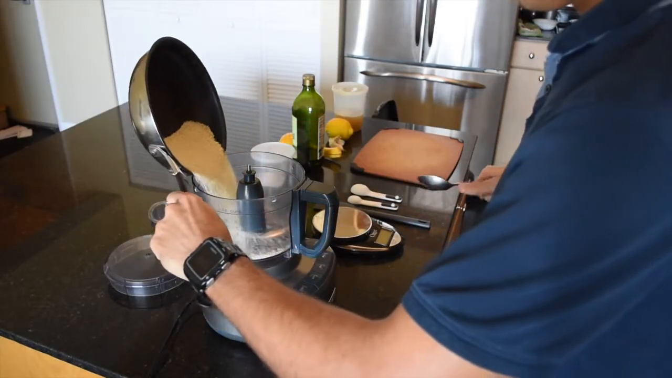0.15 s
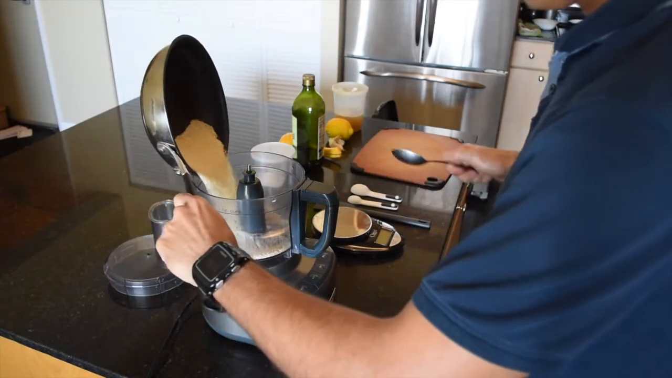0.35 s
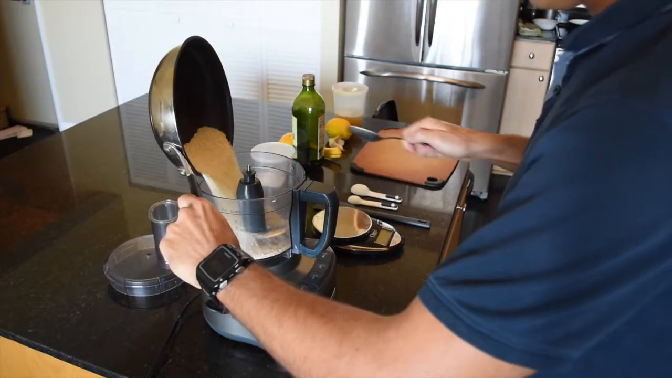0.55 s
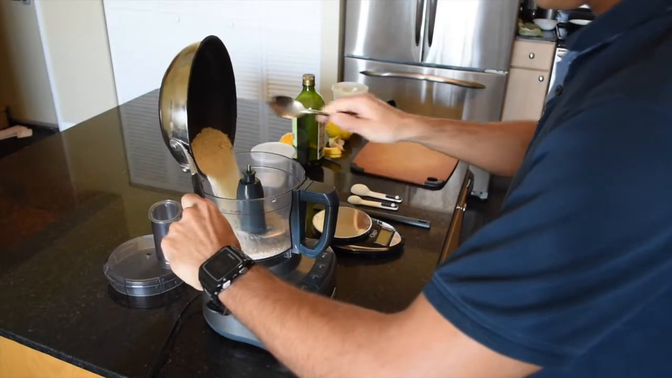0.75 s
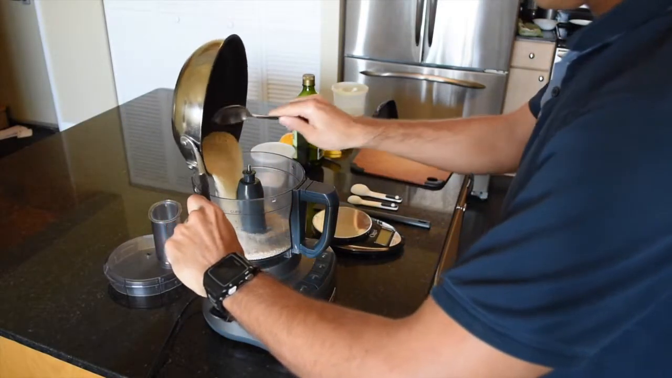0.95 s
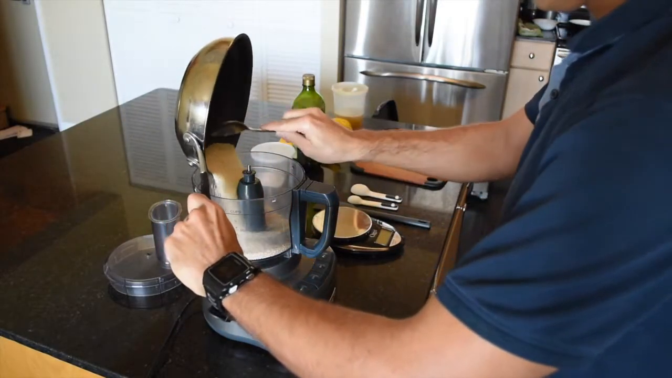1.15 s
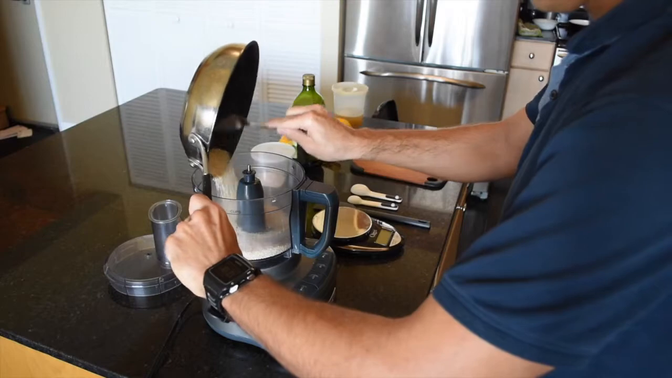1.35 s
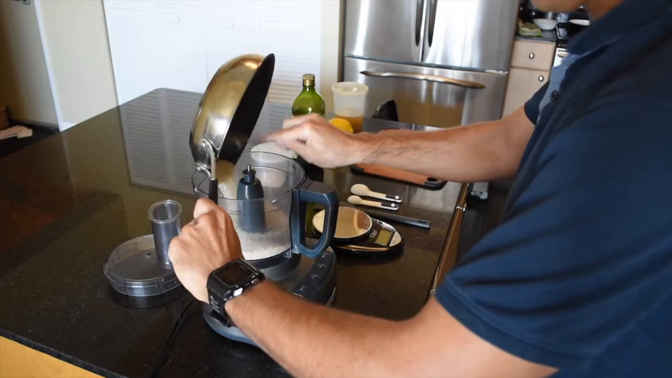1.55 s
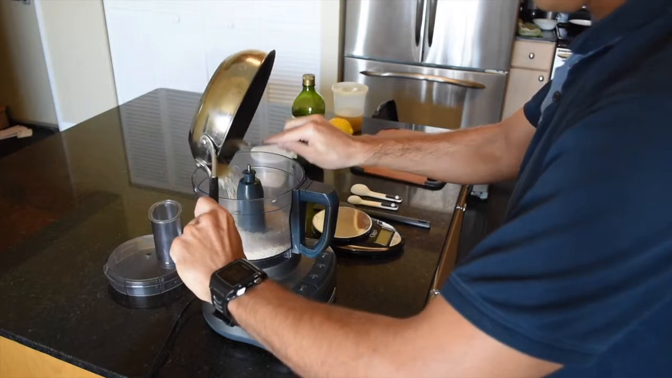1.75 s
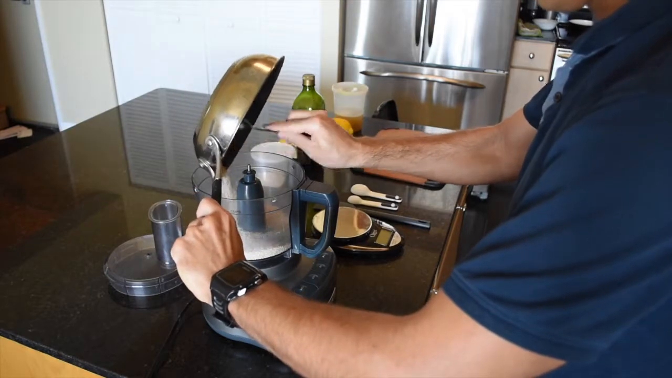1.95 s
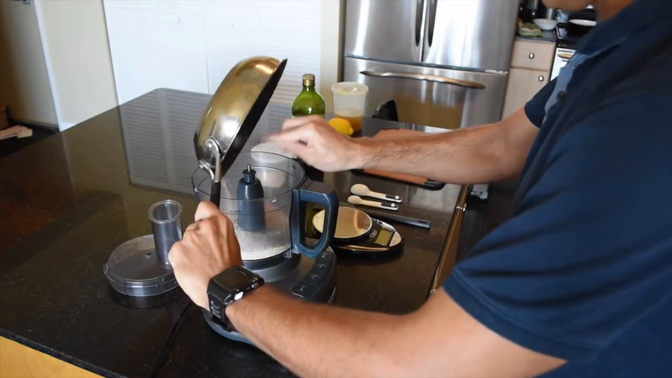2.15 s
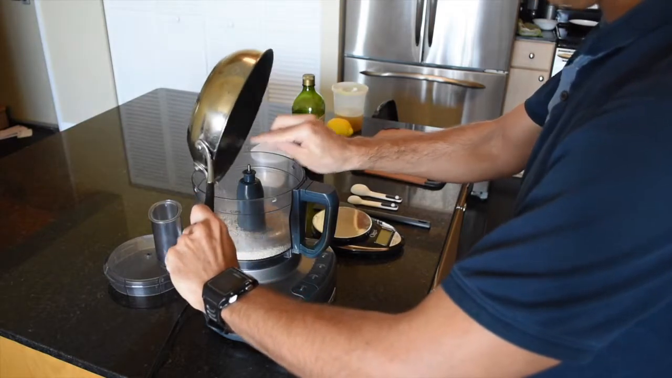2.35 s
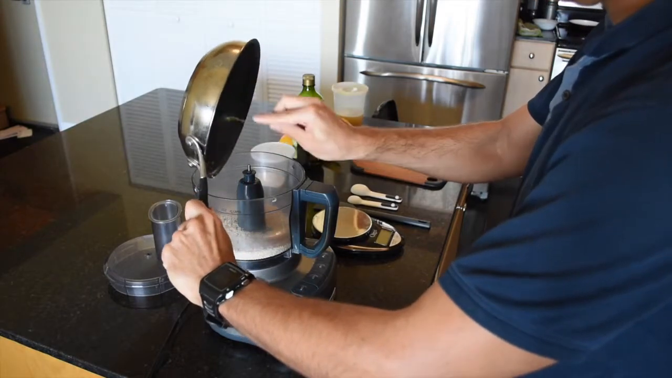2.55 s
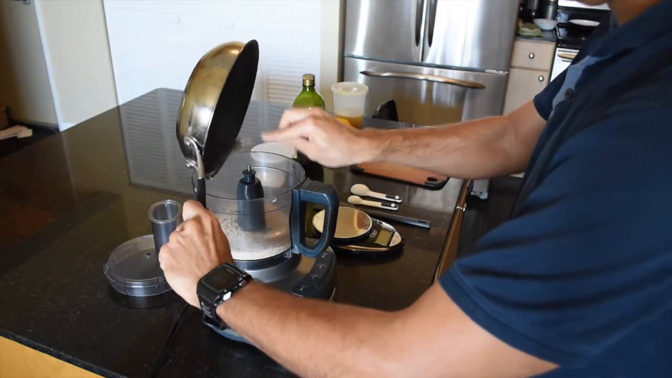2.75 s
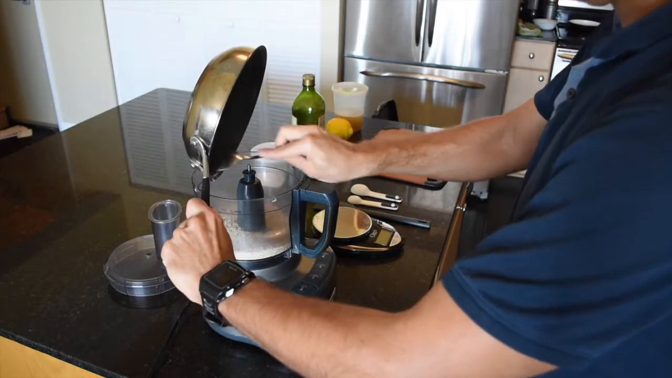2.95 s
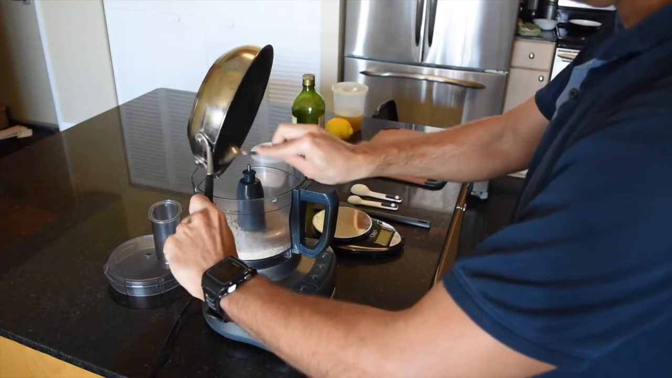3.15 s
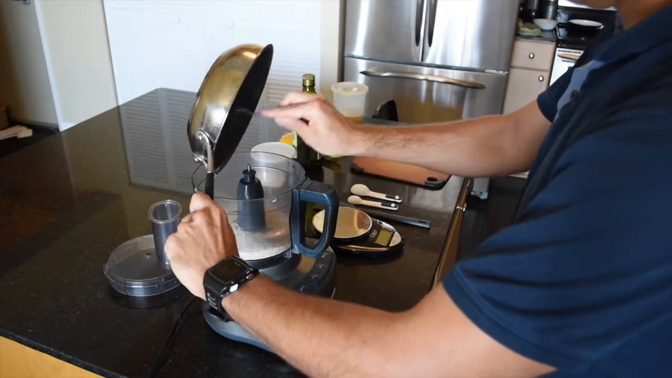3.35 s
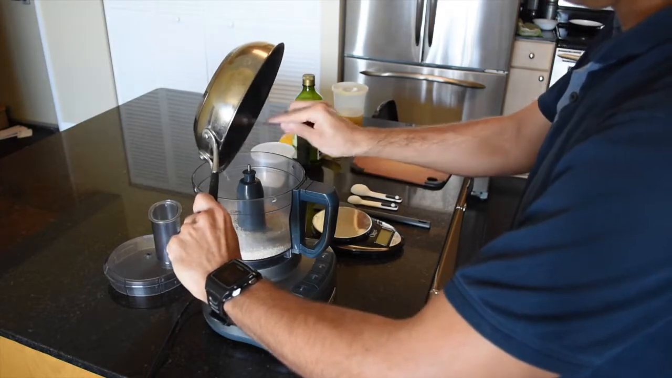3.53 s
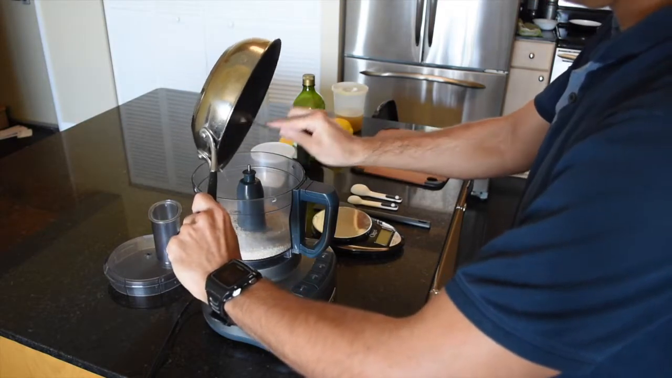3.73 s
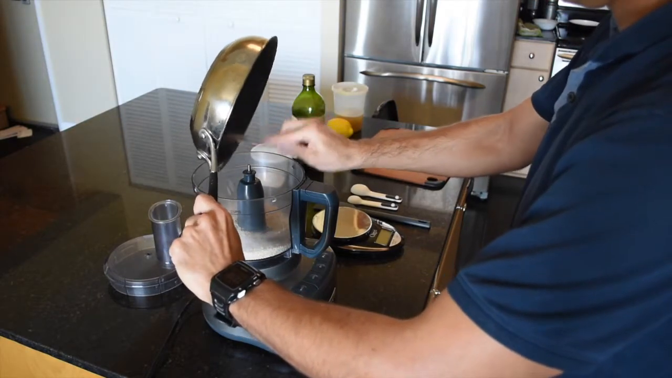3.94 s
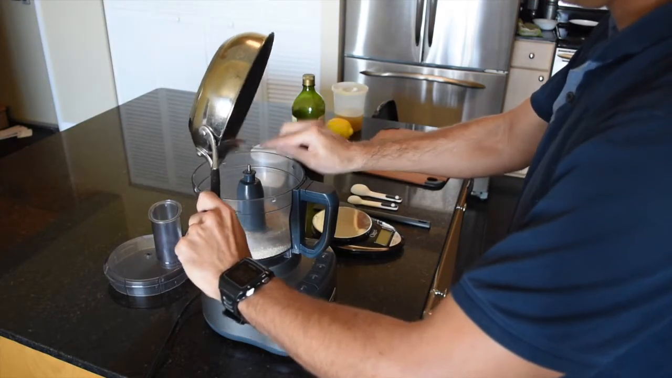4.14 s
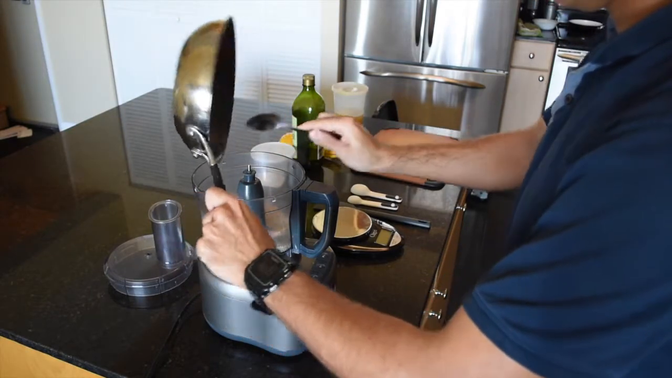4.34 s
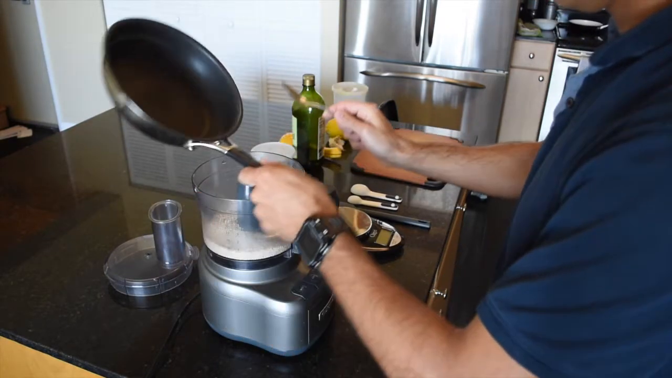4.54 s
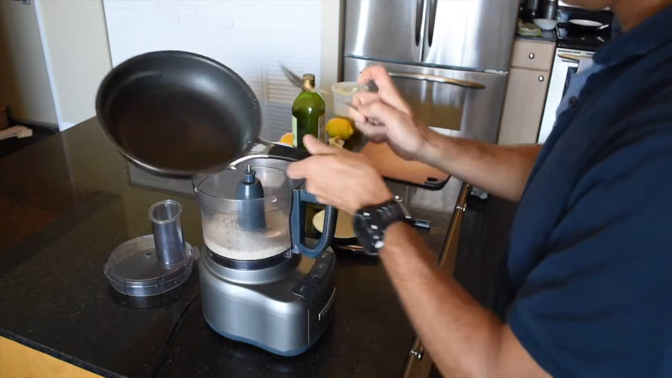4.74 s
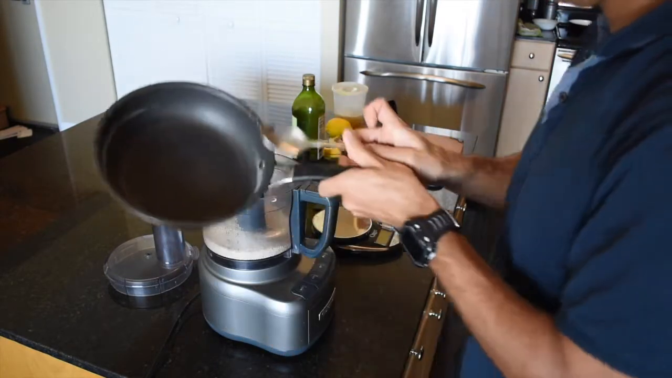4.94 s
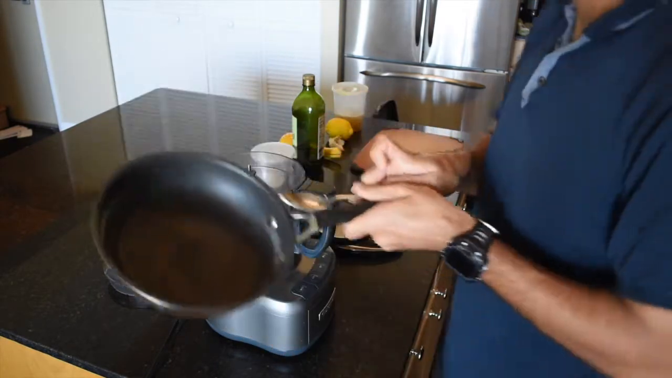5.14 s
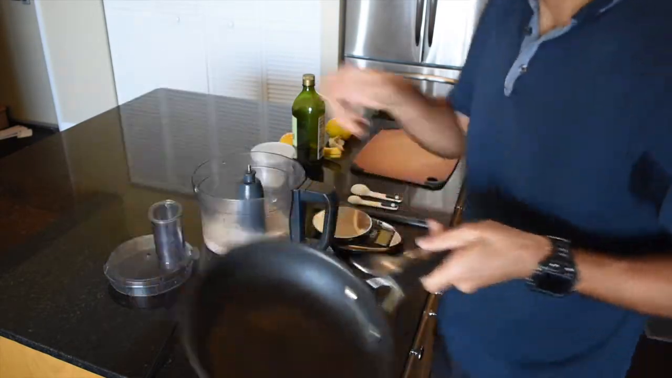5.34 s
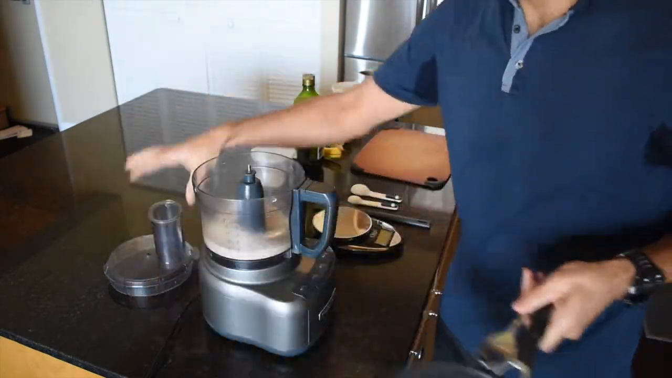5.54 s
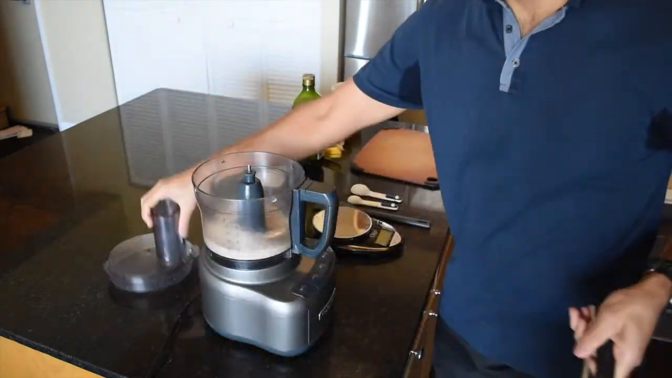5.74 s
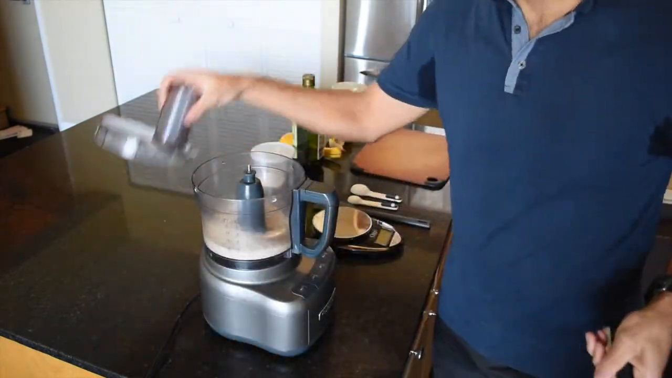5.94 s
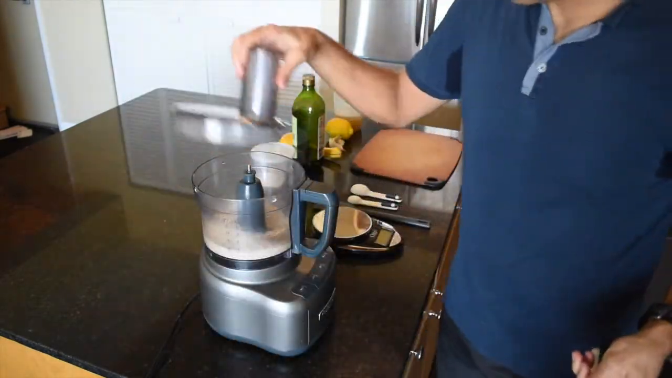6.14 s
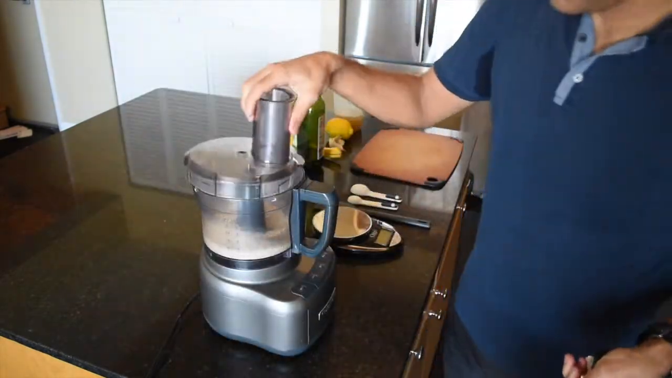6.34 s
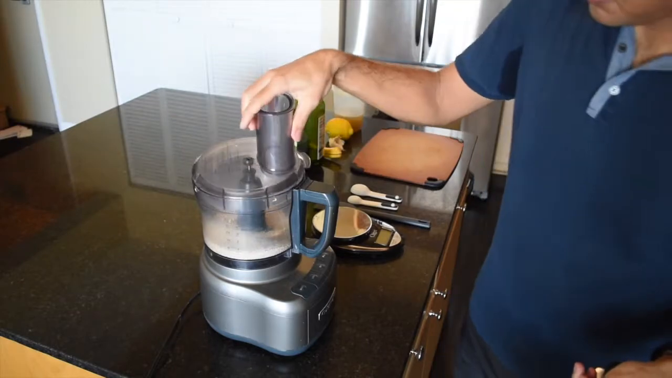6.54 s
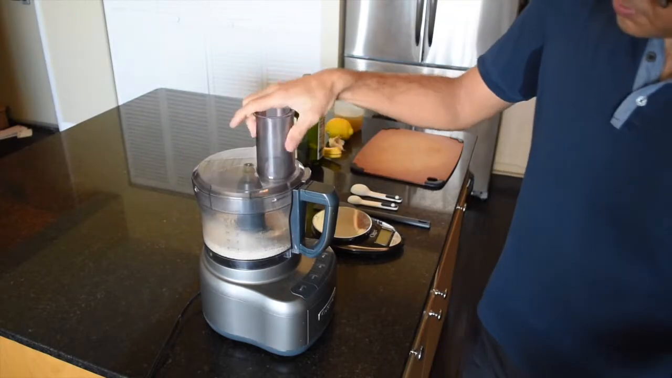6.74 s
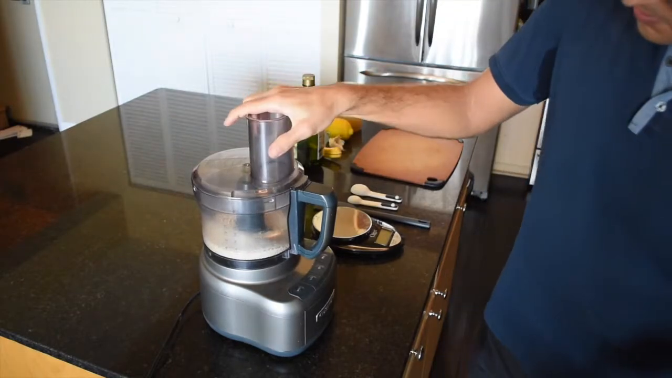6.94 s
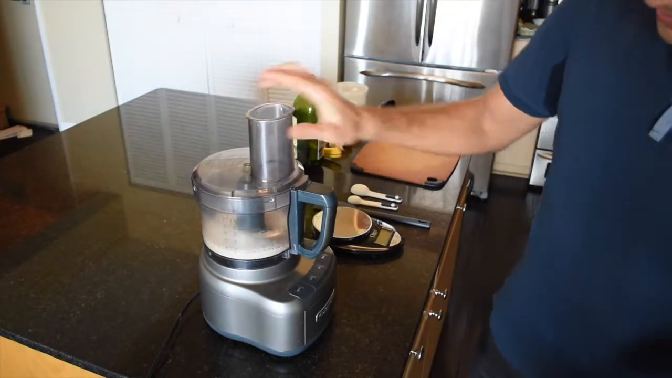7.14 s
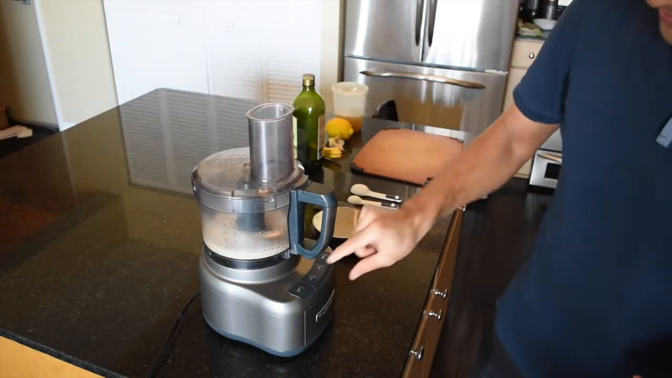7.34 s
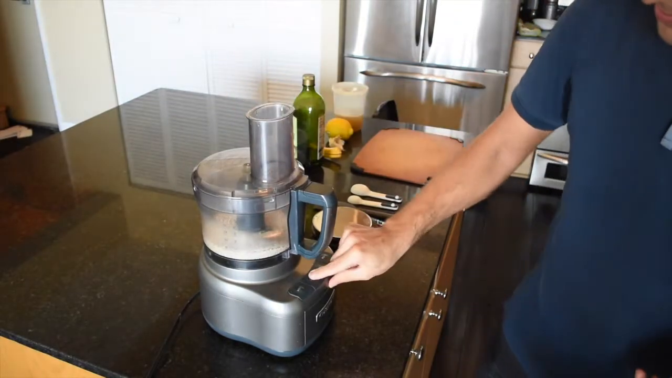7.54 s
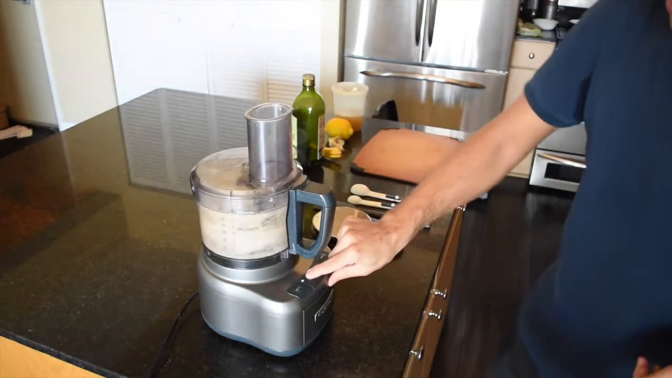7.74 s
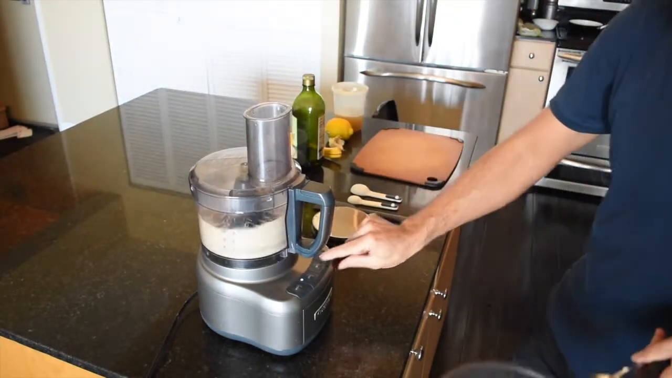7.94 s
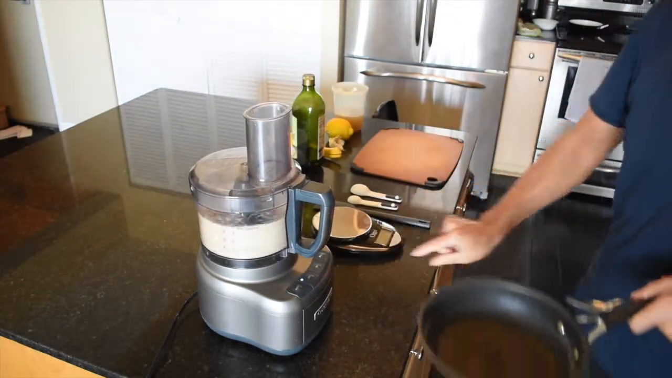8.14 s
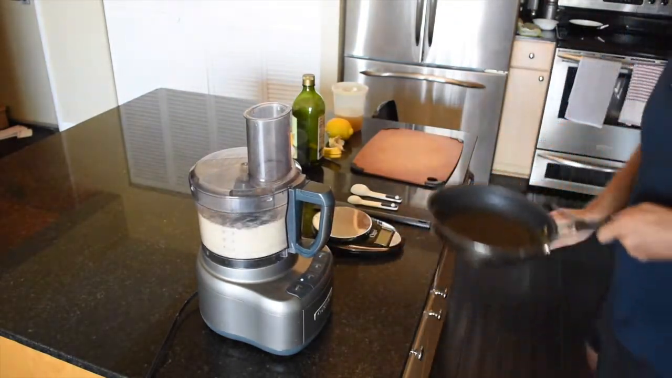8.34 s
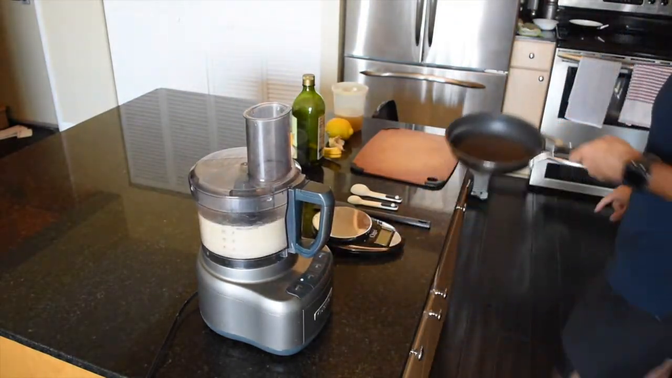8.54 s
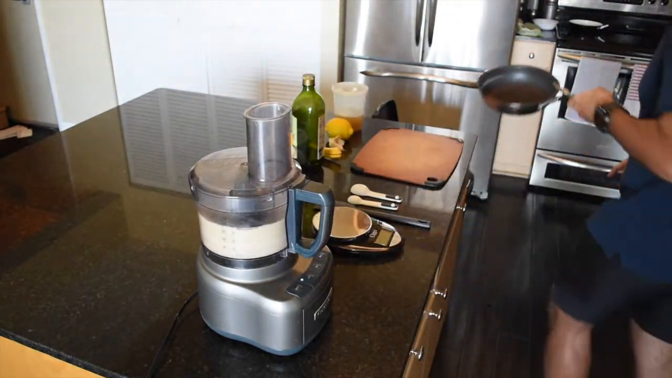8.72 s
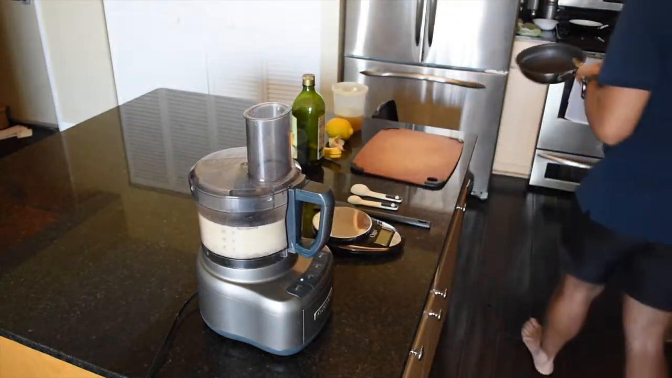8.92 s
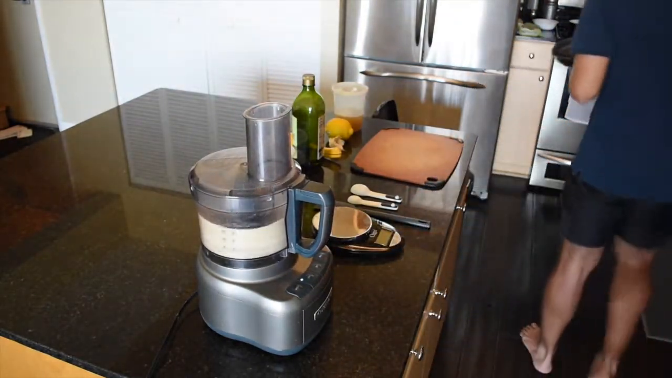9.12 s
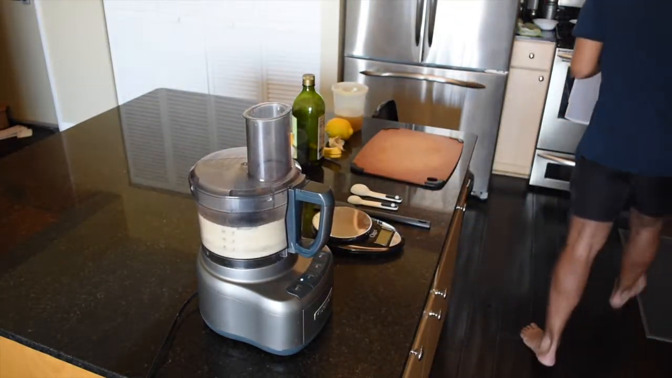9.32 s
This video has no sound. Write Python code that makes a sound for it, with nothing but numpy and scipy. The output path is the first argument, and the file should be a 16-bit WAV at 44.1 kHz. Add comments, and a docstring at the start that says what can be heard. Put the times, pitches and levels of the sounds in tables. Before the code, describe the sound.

Close stationary microphone in a moderately reverberant kitchen: a short rush of dry seeds into plastic, then about twenty bright metallic spoon taps on a pan, loosening small patters of seeds. Soft handling and a faint step follow. A hollow plastic lid is lifted, dropped on the bowl and twisted with gritty scrapes and two loud clacks. The processor then knocks into motion and runs evenly, rattling seeds over a low housing drone to the end.

```python
"""Sesame seeds hiss from a frying pan into the plastic bowl of a food processor: random grains ring pan and bowl.
A steel spoon taps the last seeds out of the pan, each tap a crack, a clank and a set of decaying modes.
The lid is picked up, set on the bowl and twisted until it locks: noise bursts, hollow notes and gritty judders.
Then the motor starts with a hard knock and the blade whirls the seeds: grains pulsing once a turn over a drone.
Kitchen reverberation, a quiet room tone, a low rumble and soft distant steps surround it all."""
import sys
import numpy as np
from scipy import signal
from scipy.fft import rfft, irfft, next_fast_len
from scipy.io import wavfile
from scipy.ndimage import uniform_filter1d

SR = 44100
rng = np.random.default_rng(int(sys.argv[2]) if len(sys.argv) > 2 else 0)


def wav_record(signal):
    """Record a signal, one row per channel, as 16-bit PCM in the file named by sys.argv[1]."""
    frames = np.transpose(np.atleast_2d(signal))
    bounded = np.clip(frames, -1, 1)
    # unit amplitude maps onto the largest positive 16-bit level
    quanta = np.round(bounded * 32767).astype(np.int16)
    wavfile.write(sys.argv[1], SR, quanta)


N = 413644
TIME = np.arange(N) / SR

# Colour of the lid's hard plastic shell. Each row: frequency in Hz, relative density in dB per Hz.
LID_SHELL_COLOUR = [(200, -33), (700, -5), (1050, 6), (1400, -0.5), (1700, 4), (2100, 2), (2700, 1),
                    (3100, 2.5), (3550, 5), (4200, -4), (5500, -4), (8000, -41), (16000, -46)]
# Colour of the lid's bright, gritty contacts. Each row: frequency in Hz, relative density in dB per Hz.
LID_GRIT_COLOUR = [(1500, -11), (4000, 4.5), (7000, -2), (10000, -7), (15500, -15), (17000, -32)]


def from_db(db):
    """Decibels to gain."""
    return 10 ** (np.asarray(db) / 20)


def rms_one(x):
    """Scale to unit rms."""
    return x / np.sqrt(np.mean(x ** 2) + 1e-20)


def since(s):
    """Seconds elapsed since time s; zero before it."""
    return np.maximum(TIME - s, 0)


def at_hz(points, hz):
    """Read a table on a log-frequency axis."""
    freqs, values = np.transpose(points)
    return np.interp(np.log(hz + 1), np.log(freqs), values)


def coloured(x, spectrum):
    """Filter an excitation to a spectrum; rms 1."""
    size = next_fast_len(N)
    hz = np.fft.rfftfreq(size, 1 / SR)
    shaped = rfft(x, size) * from_db(at_hz(spectrum, hz))
    return rms_one(irfft(shaped, size)[:N])


def noise(spectrum):
    """Steady noise of a given colour; rms 1."""
    return coloured(rng.standard_normal(N), spectrum)


def grains(per_s, spread_db):
    """Random impacts of uneven size and either sign; rms 1."""
    unevenness = np.minimum(rng.exponential(1, N), 5)
    sizes = from_db(spread_db * unevenness) * rng.choice([-1, 1], N)
    return rms_one(sizes * (rng.random(N) < per_s / SR))


def resonate(x, resonances):
    """Parallel two-pole resonances, each at its own level; rms 1."""
    out = 0
    for hz, width, db in resonances:
        r = np.exp(-np.pi * width / SR)  # pole radius
        poles = [1, -2 * r * np.cos(2 * np.pi * hz / SR), r * r]
        out = out + from_db(db) * rms_one(signal.lfilter([1, 0, -1], poles, x))
    return rms_one(out)


def add(track, s, sound):
    """Mix a sound into a track from time s on."""
    start = max(round(s * SR), 0)
    track[start:start + len(sound)] += sound[:max(N - start, 0)]


def blows(rows):
    """Envelope of contacts (s, dB, swell s, t60 s): each swells, then dies away; their powers add."""
    power = np.zeros(N)
    t = TIME[:SR // 2] - TIME[SR // 20]  # from 50 ms before the peak
    for s, db, swell, t60 in rows:
        rise = np.exp(-.5 * (np.minimum(t, 0) / swell) ** 2)
        decay = from_db(db - 60 * np.maximum(t, 0) / t60)
        add(power, s + t[0], (rise * decay) ** 2)
    return np.sqrt(power)


def ring(modes, strengths_db, sustain=1):
    """Free decay of modes struck with the given strengths; sustain scales every t60."""
    hz, db, t60 = np.transpose(modes)[:, :, None]
    t = TIME[:SR * 2 // 3]
    height = rng.choice([-1, 1], hz.shape) * from_db(db + np.reshape(strengths_db, (-1, 1)))
    decay = np.exp(-np.log(1000) * t / (t60 * sustain))
    return np.sum(height * decay * np.sin(2 * np.pi * hz * t), axis=0)


def background(tone_db):
    """Quiet room air over a low rumble of changing level, and soft distant steps through the floor."""
    # Colour of the room air. Each row: frequency in Hz, relative density in dB per Hz.
    air_colour = [(15, -23.5), (25, -6.5), (72, -12), (270, -7.5), (416, -18.5), (476, -16), (1160, -25),
                  (2160, -30.5), (3620, -30), (14400, -40), (16000, -43)]
    # Colour of the low rumble. Each row: frequency in Hz, relative density in dB per Hz.
    rumble_colour = [(20, 4), (45, -3.5), (80, -15), (170, -13.5), (300, -13.5), (700, -19.5), (2000, -47)]
    # Loudness of the rumble. Each row: time in seconds, level in dB.
    rumble_level = [(1.1, -55), (1.2, -65.5), (4.9, -78), (9.38, -79.5)]
    # Distant steps. Each row: peak in seconds, level in dB.
    step_times = [(5.12, -58), (8.46, -65), (9.049, -58)]
    # Colour of the floor. Each row: frequency in Hz, relative density in dB per Hz.
    step_colour = [(20, 4), (36, 9), (48, -9), (70, -29), (200, -44)]
    rumble_db = np.interp(TIME, *np.transpose(rumble_level))
    steps = blows([(s, db, .05, .4) for s, db in step_times]) * noise(step_colour)
    return from_db(tone_db) * noise(air_colour) + from_db(rumble_db) * noise(rumble_colour) + steps


def seeds(hiss_db, ring_db, patter_db, patter_ring_db):
    """Seeds stream into the bowl, ever sparser and softer; four brief showers of loose seeds follow."""
    # Hiss of the seeds. Each row: frequency in Hz, relative density in dB per Hz.
    hiss_colour = [(120, -36.5), (200, -27.5), (659, -16), (1020, -38), (1500, -3.5), (1810, -21),
                   (1940, -9.5), (2610, -15), (3620, -4), (3970, -7), (5230, -3.5), (6400, -12),
                   (12800, -12.5), (16000, -22)]
    # Pan and bowl under the seeds. Each row: frequency in Hz, width in Hz, relative level in dB.
    pour_resonances = [(1406, 65, 6), (1485, 50, -7), (3484, 32, 8.5), (4300, 110, -4), (5200, 96, -10),
                       (6900, 100, -2.5), (9000, 110, -4), (10600, 130, -9)]
    # Seeds shaken loose by the taps. Each row: centre in seconds, relative level in dB.
    showers_freed = [(2.715, -39.5), (2.98, -46), (3.215, -46), (3.55, -50.5)]
    # The heap slides out and thins, leaving a trickle that then runs dry; slopes in dB per second.
    heap_db, heap_hold_s, heap_fall = -37.5, .2, 34
    trickle_db, trickle_end_s, trickle_fall = -52.5, 1.145, 56.5
    shower_spread_s = 0.019
    heap = from_db(heap_db - heap_fall * since(heap_hold_s))
    trickle = from_db(trickle_db - trickle_fall * since(trickle_end_s))
    flow = np.hypot(heap, trickle)
    impacts = grains(2500 + 14000 * flow / flow.max(), spread_db=-1.0)
    hiss = from_db(hiss_db) * coloured(impacts, hiss_colour)
    stream = flow * (hiss + from_db(ring_db) * resonate(impacts, pour_resonances))
    # even out the changing grain density, so that flow alone sets the level
    stream = stream / np.sqrt(uniform_filter1d(impacts ** 2, size=SR // 10) + 1e-9)
    showers = sum(from_db(db) * np.exp(-.5 * ((TIME - s) / shower_spread_s) ** 2) for s, db in showers_freed)
    loose = grains(900, spread_db=2.0)
    patter = from_db(patter_db) * coloured(loose, hiss_colour)
    patter = patter + from_db(patter_ring_db) * resonate(loose, pour_resonances)
    return stream + showers * patter


def bumps_ticks_and_blade_knock(bump_t60, tick_t60):
    """Dull bumps of the nudged bowl, light handling ticks, and one hard knock of the blade as the motor starts."""
    # Nudges of the bowl on its base. Each row: peak in seconds, relative level in dB.
    nudges = [(0.46, -38), (1.545, -42.5), (2.239, -39), (3.238, -45)]
    # Colour of the nudged bowl. Each row: frequency in Hz, relative density in dB per Hz.
    nudge_colour = [(60, -29.5), (185, -24), (240, 7.5), (320, -4), (370, -7), (500, 9), (650, -11),
                    (1200, -20), (5000, -37)]
    # Light handling ticks, and last the far louder knock of the blade as the motor starts.
    # Each row: peak in seconds, relative level in dB.
    ticks_and_knock = [(4.721, -66), (4.82, -65.5), (4.99, -58), (5.239, -60.5), (7.588, -32.5)]
    bumps = blows([(s, db, .001, bump_t60) for s, db in nudges]) * noise(nudge_colour)
    contact_noise = noise(LID_SHELL_COLOUR) + 0.37 * noise(LID_GRIT_COLOUR)
    contacts = blows([(s, db, .0005, tick_t60) for s, db in ticks_and_knock]) * contact_noise
    return bumps + contacts


def spoon(taps, modes, shell, ring_db, treble_ring_db, sustain, body_db, crack_db, body_t60, crack_t60):
    """Steel on the pan: a crack, a short clank, and modes whose strengths depend on the spot struck."""
    # Crack of the contact. Each row: frequency in Hz, relative density in dB per Hz.
    crack_colour = [(1000, -22), (2400, 0), (3200, 11.5), (3800, -3.5), (4500, 2.5), (6200, -2.5),
                    (8000, -0.5), (12000, 0.5), (15500, -7), (17000, -20.5)]
    # Near the lip some modes are struck near their nodes, others near their bellies.
    # Each row: frequency in Hz, change in dB at the lip.
    lip_colour = [(1530, -0.5), (3120, -4), (4500, 5), (5190, 1.5), (5700, -7.5), (6500, 2.5), (8000, -0.5)]
    # each dB of strength above a firm tap adds this many extra dB; below it, takes them away
    firm_tap_db, clank_growth, crack_growth = -27, 0.13, 0.33
    crack_octaves = 2.2  # height of the crack above the lowest mode
    mode_scatter_db = 3.5  # from tap to tap, at the highest mode
    rings, clanks, cracks = np.zeros(N), [], []
    mode_hz = np.array(modes)[:, 0]
    octaves = np.log2(mode_hz / mode_hz[0])
    height = octaves / octaves[-1]
    for s, db, brightness, spot in taps:
        scatter_db = mode_scatter_db * height * rng.standard_normal(len(modes))
        spot_db = spot * at_hz(lip_colour, mode_hz) + scatter_db
        tone_db = brightness * octaves + treble_ring_db * height
        add(rings, s, ring(modes, db + ring_db + tone_db + spot_db, sustain))
        force_db = db - firm_tap_db
        clanks.append((s, db + body_db + clank_growth * force_db, .0002, body_t60))
        sharpness_db = crack_growth * force_db + crack_octaves * brightness
        cracks.append((s, db + crack_db + sharpness_db, .0002, crack_t60))
    return rings, blows(clanks) * noise(shell) + blows(cracks) * noise(crack_colour)


def pan_taps():
    """The spoon taps the pan, exciting its modes and a dense short-lived body."""
    # Each row: start in seconds, relative strength in dB, brightness in dB per octave,
    # spot struck from -1 high up to 1 near the lip.
    taps = [(1.147, -42.5, -1.5, -.1), (1.403, -33, 0.5, -0.89), (1.521, -38.5, -6, -0.76),
            (1.577, -30.5, 0.16, -0.16), (1.730, -26.5, 0.5, -0.64), (1.882, -29, 1, -0.065),
            (1.971, -37.5, -1.5, -0.73), (2.027, -27.5, 1.3, 0), (2.132, -40, .8, 0.22),
            (2.188, -28.5, .3, 0.69), (2.383, -28.5, -1.5, 0.19), (2.616, -30, -2.4, 0.44),
            (2.885, -30, -2.4, 0.38), (3.121, -31, -3.2, 1), (3.365, -40.5, -4, -0.38),
            (3.430, -25, 0.87, 0.95), (3.617, -27.5, 1.44, -.2), (3.794, -25.5, 1.9, -0.48),
            (3.959, -25.5, 2.4, -0.07), (4.655, -63.5, -4, .5)]
    # Ring of spoon and pan. Each row: frequency in Hz, relative level in dB, t60 in seconds before sustain.
    modes = [(1482, -10, .15), (1529, -2, .6), (1565, -9, .2), (3117, 0.5, .42), (3131, -6, .3),
             (3181, -7, .2), (3299, -14, .25), (4443, -4, .22), (4562, -3, .24), (5187, -2, .18),
             (5702, 0, .19), (6496, -4, .3), (6862, -10, .3), (7227, -13, .22), (8021, -11, .22),
             (8278, -9, .22), (9259, -15, .3), (9396, -10, .18), (9623, -10, .18), (9771, -10, .18),
             (11385, -11, .16), (14277, -10, .14)]
    # Dense short-lived modes of the pan. Each row: frequency in Hz, relative density in dB per Hz.
    body = [(40, -20.5), (90, -26.5), (200, -23.5), (290, -9), (385, -0.5), (490, 0.5), (700, -3.5),
            (880, 3), (1100, 2), (1500, 4.5), (1900, -2.5), (3100, -12.5), (4000, -14.5), (8000, -32.5)]
    return spoon(taps, modes, body, ring_db=1.63, treble_ring_db=-6.5, sustain=0.41,
                 body_db=-2.5, crack_db=2.5, body_t60=0.14, crack_t60=0.06)


def rim_tap():
    """The spoon strikes the rim of the pan, which rings with its own modes."""
    # Each row: start in seconds, relative strength in dB, brightness in dB per octave,
    # spot struck from -1 high up to 1 near the lip.
    taps = [(4.158, -18.5, 0, .1)]
    # Ring of the rim. Each row: frequency in Hz, relative level in dB, t60 in seconds before sustain.
    modes = [(818, -16, .8), (1470, -10, .2), (3009, -6, .22), (3108, 0, .7), (3165, -4, .42),
             (3227, -4, .16), (3311, -13, .45), (3894, 3, .33), (4205, -10, .25), (4440, 3, .17),
             (4565, 3, .22), (5701, -9, .26), (7547, -10, .3), (7790, -14, .3), (8372, -14, .25),
             (11157, -11, .15)]
    # Dense short-lived modes of the rim. Each row: frequency in Hz, relative density in dB per Hz.
    body = [(30, -2.5), (90, -16.5), (200, -15.5), (290, -9), (385, 6), (490, -10.5), (800, -1.5),
            (1050, 6), (1500, 9.5), (2200, 0.5), (2900, -0.5), (3700, 15), (4300, -9), (8000, -34)]
    return spoon(taps, modes, body, ring_db=-2.0, treble_ring_db=0, sustain=0.31,
                 body_db=-0.2, crack_db=1.0, body_t60=0.063, crack_t60=.075)


def lid(clack_db, thud_db, click_db, ring_db):
    """Plastic on plastic: a gritty click, a clack of the shell and the hollow note of the bowl."""
    # Lid on counter and bowl. Each row: peak in seconds, relative strength in dB,
    # click against that strength in dB, swell in seconds.
    knocks = [(5.668, -51, -2, 0.0017), (5.737, -50.5, -20, 0.0017), (5.828, -54.5, -6, .001),
              (6.263, -23, -3, 0.0018), (6.276, -20, -18, 0.00072), (6.444, -31.5, -2.5, 0.0011),
              (6.466, -27, 1, 0.0031), (6.536, -28.5, -19, 0.00084), (6.597, -28.5, -6.5, .001),
              (6.631, -13, -8.5, 0.0051), (6.805, -37, -2.5, 0.0009), (6.881, -16, -10.5, 0.0039),
              (7.057, -40.5, -14.5, 0.0024), (7.082, -55, 1, .002)]
    # Colour of the dull thud. Each row: frequency in Hz, relative density in dB per Hz.
    thud_colour = [(30, -3), (80, -23.5), (140, -12), (220, 3.5), (290, -1), (380, 1.5), (480, 3), (650, 3),
                   (900, 1.5), (1300, -3), (4000, -52)]
    # Ring of lid and bowl. Each row: frequency in Hz, relative level in dB, t60 in seconds.
    hollow_modes = [(232, -8, .25), (268, -9, .2), (385, -8, .3), (470, -9, .35), (872, -5, .35),
                    (918, -6, .35)]
    # above loose_knock_db the hand presses the lid down:
    # each further dB shortens the knock and weakens its thud and ring by these dB
    loose_knock_db, press_shortens, press_deadens = -26, 0.58, 0.7
    knock_t60_s, thud_lasts = 0.086, 2.15  # a loose knock; the thud lasts this many times longer
    s, db, grit_db, swell = np.transpose(knocks)
    press_db = np.maximum(db - loose_knock_db, 0)
    t60 = knock_t60_s * from_db(-press_shortens * press_db)
    hollow_db = db - press_deadens * press_db
    clack = blows(zip(s, db + clack_db, swell, t60))
    thud = blows(zip(s, hollow_db + thud_db, swell, thud_lasts * t60))
    click = blows(zip(s, db + grit_db + click_db, swell, t60))
    out = clack * noise(LID_SHELL_COLOUR) + thud * noise(thud_colour)
    out = out + click * coloured(grains(6000, spread_db=3.5), LID_GRIT_COLOUR)
    for start, strength_db in zip(s, hollow_db):
        scatter_db = rng.normal(0, 0.67, len(hollow_modes))
        add(out, start, ring(hollow_modes, strength_db + ring_db + scatter_db))
    return out


def feed_tube():
    """The air column of the lid's feed tube sounds as the lid is lifted: noise through two resonances."""
    # Each row: peak in seconds, level in dB, swell in seconds, t60 in seconds.
    tube_knocks = [(5.843, -46.5, 0.0058, 0.16), (5.935, -64, .01, 0.15)]
    # Each row: frequency in Hz, width in Hz, relative level in dB.
    tube_resonances = [(859, 17, -1.5), (747, 78, -9.5)]
    return blows(tube_knocks) * resonate(rng.standard_normal(N), tube_resonances)


def sliding_lid(rub_db, grit_db):
    """The lid slips round the rim in judders: low resonances of the bowl under a gritty rub."""
    # Each row: peak in seconds, level in dB, swell in seconds, t60 in seconds.
    judders = [(6.283, -34, 0.0063, 0.05), (6.335, -30.5, 0.008, .15), (6.366, -30, 0.016, 0.074),
               (6.442, -33, 0.011, .08), (6.582, -39, .003, .1)]
    # Each row: frequency in Hz, width in Hz, relative level in dB.
    judder_resonances = [(384, 18, 0), (470, 30, -9), (270, 60, -4), (880, 60, -7)]
    slips = grains(6000, spread_db=7.0)
    rub = from_db(rub_db) * coloured(slips, LID_SHELL_COLOUR)
    grit = from_db(grit_db) * coloured(slips, LID_GRIT_COLOUR)
    return blows(judders) * (resonate(rng.standard_normal(N), judder_resonances) + rub + grit)


def processor(wall_db, ring_db, note_db, hiss_db, housing_db, uneven_db):
    """Once a turn the blade flings a spray of seeds at the wall; the bowl rings and the housing drones."""
    # Seeds on the wall. Each row: frequency in Hz, relative density in dB per Hz.
    wall_colour = [(500, -49), (1200, -0.5), (1900, -2), (2400, 3), (3000, 1.5), (3700, 0), (4200, -6),
                   (5800, -10), (7500, -26.5), (16000, -45)]
    # Seeds in the air. Each row: frequency in Hz, relative density in dB per Hz.
    fine_colour = [(2500, -24), (5000, 5.5), (6200, 0.5), (7500, 0.5), (10000, 0), (13000, 0),
                   (15700, -7.5), (16500, -30)]
    # Drone of the housing. Each row: frequency in Hz, relative density in dB per Hz.
    housing_colour = [(50, -38), (95, -22), (130, -4.5), (185, 1.5), (240, 2.5), (330, -6.5), (480, -1),
                      (650, 2), (950, 4.5), (1400, -1.5), (2200, -15), (5000, -40)]
    # Ring of the bowl. Each row: frequency in Hz, width in Hz, relative level in dB.
    bowl_resonances = [(904, 13, 2.5), (1310, 29, -6), (1280, 32, 1), (1618, 56, 3), (2156, 30, 3.5),
                       (3570, 80, -25)]
    # Main note of the bowl. Each row: frequency in Hz, width in Hz, relative level in dB.
    main_note = [(2557, 60, 7), (2520, 40, -17)]
    blade_hz = 59.8
    # the motor comes up to speed at once and then grinds at a steady level
    at_speed_s, run_up_db_per_s, grind_db = 7.569, 1501, -42.5
    surge_db, surge_s = 7.5, 0.059  # the housing drones louder under the starting load
    fine_lack_db, fine_grows_s = 11.5, 0.1  # the fine hiss grows as the seeds take to the air
    # the blade's beat is deep while the seeds still lie in a heap, then evens out
    heap_beat_db, even_beat_db, heap_spreads_s = 1.5, 1.5, 0.27
    # as the seeds climb the wall, the main note of the bowl swells once and the beat deepens
    climb_s, climb_spread_s, climb_db, climb_beat_db = 7.89, 0.11, 9, 1

    running_s = since(at_speed_s)
    level_db = grind_db - run_up_db_per_s * np.clip(at_speed_s - TIME, 0, 1)
    fine_db = -fine_lack_db * np.exp(-running_s / fine_grows_s)
    motor_db = surge_db * np.exp(-running_s / surge_s)
    climb = np.exp(-.5 * ((TIME - climb_s) / climb_spread_s) ** 2)
    depth_db = even_beat_db + heap_beat_db * np.exp(-running_s / heap_spreads_s) + climb_beat_db * climb
    turns = blade_hz * (TIME - 7.573)
    # each turn catches more or fewer seeds
    load_db = np.interp(TIME * blade_hz, np.arange(SR // 10), rng.standard_normal(SR // 10))
    spray = from_db(depth_db * np.cos(2 * np.pi * turns) + uneven_db * load_db)
    spray = spray / np.sqrt(uniform_filter1d(spray ** 2, size=SR // 10))  # steady over 0.1 s
    impacts = spray * grains(11000, spread_db=1.5)
    softer_beat = np.sqrt(spray)
    wall = from_db(wall_db) * coloured(impacts, wall_colour)
    bowl = from_db(ring_db) * resonate(impacts, bowl_resonances)
    note = from_db(note_db + climb_db * climb) * resonate(impacts, main_note)
    airborne = softer_beat * grains(22000, spread_db=2.5)
    hiss = from_db(hiss_db + fine_db) * coloured(airborne, fine_colour)
    drone = coloured(softer_beat * rng.standard_normal(N), housing_colour)
    housing = from_db(housing_db + motor_db) * drone
    return from_db(level_db) * (wall + bowl + note + hiss + housing)


def kitchen(x, build_s):
    """Diffuse reflections that build up quickly and decay at a different rate in each band; unit energy."""
    # Reverberation of the kitchen. Each row: frequency in Hz, t60 in seconds.
    room_t60 = [(100, 0.64), (400, 0.49), (900, 0.74), (2700, 0.68), (5400, 0.51), (8000, 0.55),
                (11000, 0.094), (16000, 0.53)]
    t, edges = TIME[:SR], np.geomspace(40, 18000, 14)
    white, response = rng.standard_normal((2, SR)), 0
    for k, (low, high) in enumerate(zip(edges, edges[1:])):
        sos = signal.butter(2, [low, high], "band", fs=SR, output="sos")
        band = signal.sosfilt(sos, white[k % 2])  # neighbouring bands use different noise
        response = response + band * np.exp(-np.log(1000) * t / at_hz(room_t60, np.sqrt(low * high)))
    response = response * (1 - np.exp(-t / build_s))
    return signal.fftconvolve(x, response / np.sqrt(np.sum(response ** 2)))[:N]


def scene():
    """All sources on the counter, each with its share of the room."""
    steady = seeds(hiss_db=-2.0, ring_db=-11.5, patter_db=-1.0, patter_ring_db=-6.5)
    steady = steady + processor(wall_db=-0.7, ring_db=-11.0, note_db=-15.0, hiss_db=-8.0,
                                housing_db=-8.0, uneven_db=0.9)
    pan_ring, pan_hit = pan_taps()
    rim_ring, rim_hit = rim_tap()
    metal = pan_ring + rim_ring + pan_hit + rim_hit
    plastic = bumps_ticks_and_blade_knock(bump_t60=0.13, tick_t60=0.047) + feed_tube()
    plastic = plastic + lid(clack_db=-1.36, thud_db=-2.0, click_db=-2.5, ring_db=-9.5)
    plastic = plastic + sliding_lid(rub_db=-12, grit_db=-16)
    sent = from_db(-7) * metal + from_db(-8.5) * plastic + from_db(-10.0) * steady
    mix = metal + plastic + steady + kitchen(sent, build_s=0.0066) + background(tone_db=-70.5)
    return mix[None]


def record(dry):
    """The loudest peaks are rounded, the level dips briefly twice, the top is cut."""
    # Brief dips of the level: a plain list of centres in seconds.
    dip_times = [1.135, 7.456]
    overload = .45  # ceiling the rounded peaks approach, full scale 1
    stopband_hz = 17100  # at least 60 dB down from here
    rounded = dry / (1 + (dry / overload) ** 4) ** .25
    dips = 1 - .9 * sum(np.exp(-((TIME - s) / .009) ** 4) for s in dip_times)
    low_pass = signal.cheby2(16, 60, stopband_hz, fs=SR, output="sos")
    return signal.sosfilt(low_pass, rounded * dips)


dry = scene()
out = record(dry)
wav_record(out)
```